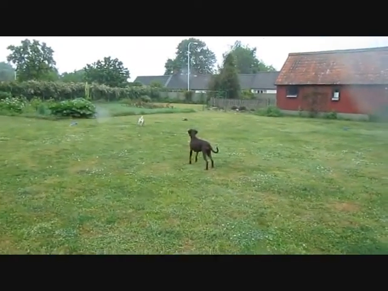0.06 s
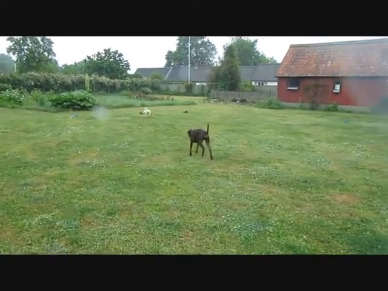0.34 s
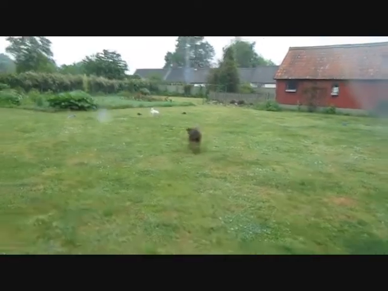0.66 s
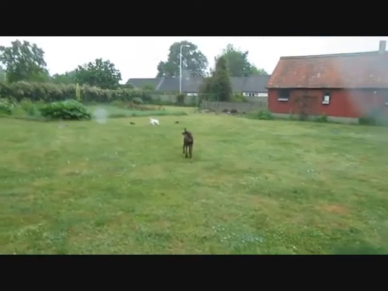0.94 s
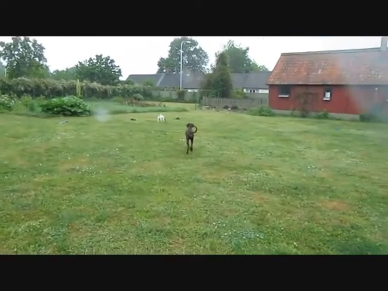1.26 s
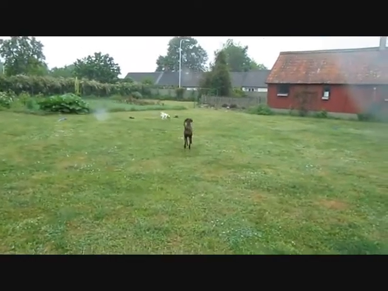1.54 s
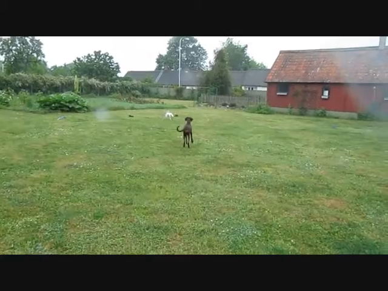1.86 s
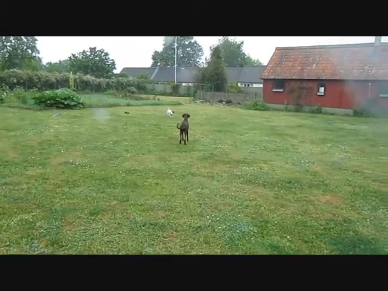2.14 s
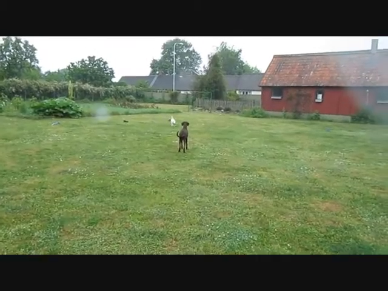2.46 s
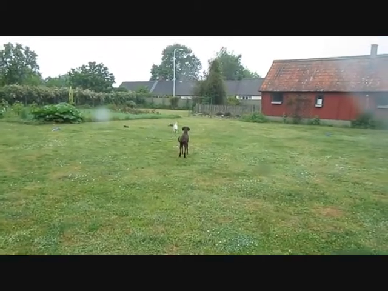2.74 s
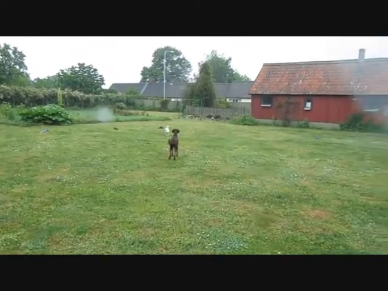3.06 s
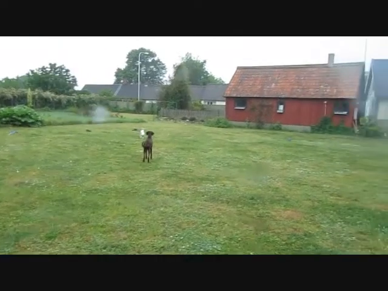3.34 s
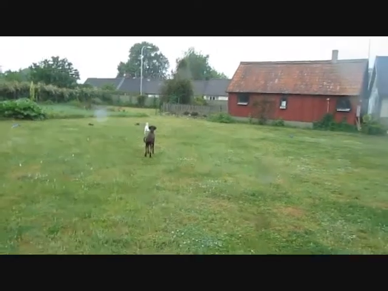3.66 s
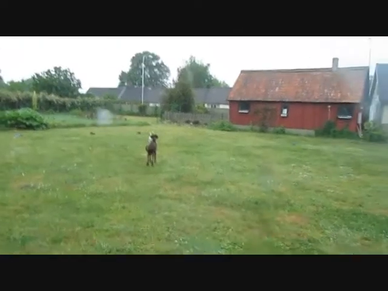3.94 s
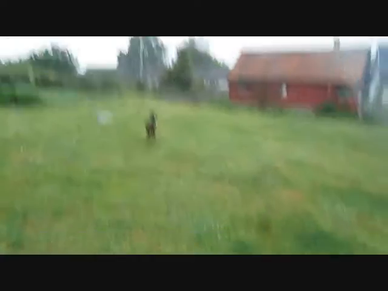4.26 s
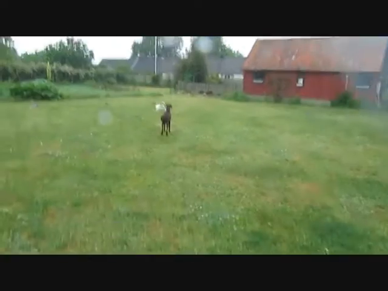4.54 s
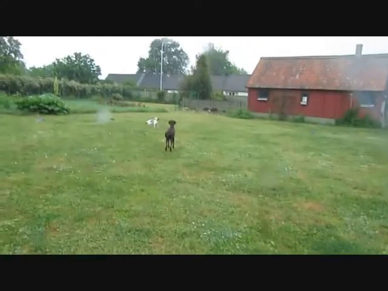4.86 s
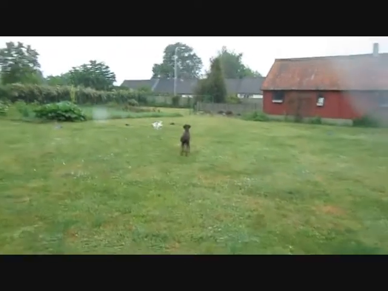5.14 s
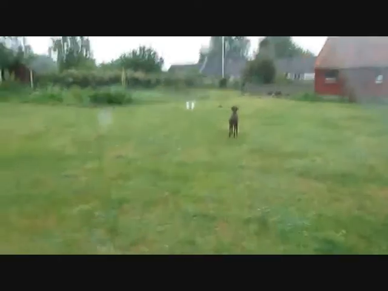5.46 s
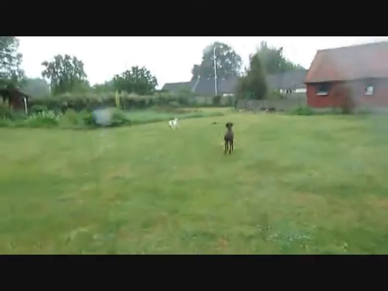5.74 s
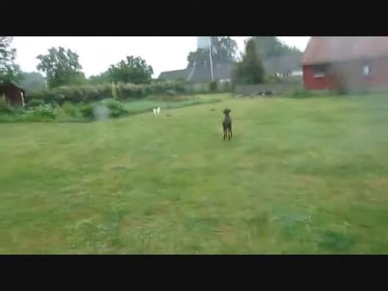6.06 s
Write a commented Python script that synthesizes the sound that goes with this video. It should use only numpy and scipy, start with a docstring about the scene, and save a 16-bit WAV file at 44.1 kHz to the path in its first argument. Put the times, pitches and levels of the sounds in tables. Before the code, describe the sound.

Sparrows chirp and cheep in an open garden for about six seconds, giving quick whistled calls two or three times a second, some slightly harsh, each with a light echo. A farther bird adds soft falling whistles and another twitters thin and high. A faint wash of distant roads and leaves lies underneath. During the first second, a cluster of dull, close handling bumps hits the hand-held microphone, with more near 2, 3.5, 4.3 and 6.2 seconds. Light gusts rumble and flutter on the microphone on and off, strongest from about 5.2 to 5.5 seconds, where a very faint low drone also swells and drops away. Between 5.5 and 6.1 seconds the plastic casing gives several sharp clicks, the loudest at about 5.8 seconds. The birds keep calling to the end.

```python
"""Sparrows on a breezy lawn

Sparrows chirp in quick whistled arches while a farther bird slurs falling whistles and another
twitters thinly. Trees, a barn and far houses throw the calls back over a distant wash of roads
and leaves. Light gusts rumble on a hand-held camera's two microphone ports; the hand gives it
dull bumps, and near the end its plastic casing rings with a few sharp clicks."""
import sys
import numpy as np
from scipy import signal
from scipy.fft import rfft, irfft
from scipy.io import wavfile
from scipy.ndimage import uniform_filter1d

SR = 44100
rng = np.random.default_rng(int(sys.argv[2]) if len(sys.argv) > 2 else 0)


def unload_audio(sound):
    """Save the sound as a 16-bit wav file, at the path given as the first command line argument."""
    columns = np.transpose(np.atleast_2d(sound))
    # keep every value between -1 and 1, then stretch to whole-number steps
    steps = np.round(np.clip(columns, -1, 1) * 32767)
    wavfile.write(sys.argv[1], SR, steps.astype(np.int16))


N = 277871
TIME = np.arange(N) / SR


def gain_of(db):
    """Decibels to amplitude."""
    return 10 ** (np.asarray(db) / 20)


def unit_rms(x):
    """Scales to rms 1."""
    return x / np.sqrt(np.mean(x ** 2) + 1e-20)


def at_hz(points, hz):
    """Reads a curve on a log-frequency axis."""
    point_hz, value = np.transpose(points)
    return np.interp(np.log(hz + 1), np.log(point_hz + 1), value)


def automation(rows):
    """Each column of a breakpoint table at every sample."""
    times, *columns = np.transpose(rows)
    return [np.interp(TIME, times, column) for column in columns]


def add(mix, start_s, sound):
    """Mixes a sound in at its start time."""
    part = mix[max(round(start_s * SR), 0):][:len(sound)]
    part += sound[:len(part)]


def wobble(rate_hz):
    """Smooth random motion of rms 1, rolling off above the rate."""
    hz = np.fft.rfftfreq(N, 1 / SR)
    return unit_rms(irfft(rfft(rng.standard_normal(N)) * np.exp(-(hz / rate_hz) ** 2), N))


def stereo_noise(spectrum, correlation, patchy_db):
    """Coloured stereo noise of rms 1 with drifting louder and softer patches."""
    frames, hz = N // 512 + 5, np.fft.rfftfreq(2048, 1 / SR)
    a, b, c, d, patches = np.moveaxis(rng.standard_normal((frames, len(hz), 5)), -1, 0)
    patches = unit_rms(uniform_filter1d(uniform_filter1d(patches, size=7, axis=0), size=14, axis=1))
    left = a + 1j * b
    right = correlation * left + np.sqrt(1 - correlation ** 2) * (c + 1j * d)
    spectra = np.array([left, right]) * gain_of(at_hz(spectrum, hz) + patchy_db * patches)
    return unit_rms(signal.istft(spectra.swapaxes(1, 2), nperseg=2048, noverlap=1536)[1][:, :N])


def noise_band(centre_hz, width_hz):
    """One band of noise around a steady or moving centre."""
    phase = 2 * np.pi * np.cumsum(centre_hz * np.ones(N)) / SR
    return unit_rms(wobble(width_hz) * np.cos(phase) + wobble(width_hz) * np.sin(phase))


# Fader moves of the wash (before its trim) and the hiss: time_s, level_db
WASH_FADER = [(0, -48.5), (.4, -46.5), (1.72, -51), (3.2, -51), (4.5, -51), (5.36, -53.5), (5.64, -47),
              (6.1, -50), (6.15, -57), (6.3, -50.5)]
HISS_FADER = [(.33, -68), (.38, -57), (.7, -57), (1.05, -60.5), (1.2, -66), (1.36, -62), (1.53, -62),
              (1.58, -72), (5.6, -66), (5.85, -64), (6.3, -64.5)]
# Their tone, a midrange wash and an airy hiss: freq_hz, relative_db
WASH_EQ = [(60, -33), (200, -17.5), (450, -3.5), (900, 2), (1400, 0), (2400, -0.5), (3300, -5.5),
           (3900, -11.5), (6200, -9.5), (8500, -23), (10500, -34), (14500, -72)]
HISS_EQ = [(1500, -25), (4000, -4), (6500, 8.5), (9500, 5), (12500, -6.5), (15000, -13)]


def air():
    """The far wash of roads and trees, and a faint hiss that comes and goes."""
    wash_db, hiss_db = automation(WASH_FADER)[0], automation(HISS_FADER)[0]
    wash = gain_of(wash_db + 2.5) * stereo_noise(WASH_EQ, correlation=.56, patchy_db=1.5)
    hiss = gain_of(hiss_db) * stereo_noise(HISS_EQ, correlation=.1, patchy_db=1)
    return wash * gain_of([[-.8], [.8]]) + hiss


# Broad tyre hum inside the wash: time_s, centre_hz, level_db
TYRE_HUM = [(0, 898, -58), (.6, 948, -50), (1.3, 1047, -50.5), (1.7, 1332, -47.5), (2.4, 1388, -49),
            (3.2, 1418, -53.5), (4.2, 1288, -54)]
# A low drone that swells late and drops away: time_s, level_db
DRONE_FADER = [(4.2, -89), (4.6, -68), (5.15, -61), (5.55, -58), (5.7, -101)]


def traffic():
    """Far tyres hum under a drifting pitch; a low drone, perhaps an engine, joins them."""
    centre_hz, tyres_db = automation(TYRE_HUM)
    tyres = gain_of(tyres_db) * noise_band(centre_hz, width_hz=540)
    drone = gain_of(automation(DRONE_FADER)[0]) * noise_band(centre_hz=118, width_hz=14.5)
    return tyres + drone


# Gusts on the microphone: start_s, length_s, rumble_db, flutter_db
MIC_GUSTS = [(0.115, 0.18, -67, -42.5), (0.514, 0.37, -56, -44.5), (1.008, 0.31, -58.5, -55),
             (1.63, 0.088, -46, -55), (1.928, 0.06, -50, -70), (2.16, 0.41, -54, -77),
             (2.49, 0.36, -45, -57.5), (3.152, 0.18, -46.5, -77), (3.427, 0.052, -40, -49.5),
             (3.572, 0.14, -66, -50.5), (4.218, 0.22, -39, -67), (4.72, 0.48, -52, -52),
             (5.19, 0.21, -33.5, -41.5), (5.483, 0.06, -35, -39.5), (5.73, 0.36, -54, -47)]
# Tone of the deep rumble and the lighter flutter: freq_hz, relative_db
RUMBLE_EQ = [(20, -44), (55, -8), (110, -1.5), (160, -5), (260, -22), (600, -62)]
FLUTTER_EQ = [(60, -43), (160, 2), (300, 1.5), (480, -3.5), (800, -34), (2000, -52)]


def wind(attack_s=.044, release_s=.034):
    """Gusts rise out of the breeze; their lumpy eddies push the two ports in opposite directions."""
    strength = gain_of([[-66], [-73]])  # rumble and flutter of the breeze between gusts
    for start_s, length_s, rumble_db, flutter_db in MIC_GUSTS:
        age = TIME - start_s
        envelope = np.exp(np.minimum(age, 0) / attack_s - np.maximum(age - length_s, 0) / release_s)
        strength = np.maximum(strength, gain_of([[rumble_db], [flutter_db]]) * envelope)
    rumble = strength[0] * gain_of(4.9 * wobble(rate_hz=20))
    rumble = rumble * stereo_noise(RUMBLE_EQ, correlation=-.94, patchy_db=-1.5)
    flutter = strength[1] * gain_of(1.3 * wobble(rate_hz=42))
    flutter = flutter * stereo_noise(FLUTTER_EQ, correlation=-.75, patchy_db=2.5)
    return (rumble + flutter) * gain_of([[-.8], [.8]])


# Soft handling thuds: start_s, level_db, pitch_hz, left_minus_right_db
HAND_BUMPS = [(.008, -24, 230, -3.5), (.023, -26, 270, -4.5), (.127, -28, 280, -2), (.184, -24, 300, -2.5),
              (.241, -19, 294, -4), (.266, -27, 320, -3), (.554, -26, 260, -4.5), (.585, -27, 210, -3),
              (.677, -33, 337, -5), (.771, -23, 300, -4.5), (.804, -25.5, 290, -5),
              (.815, -26, 230.8, -3.5), (.881, -32, 376, -5), (1.979, -26, 327, -4.5), (3.526, -23, 337, 5),
              (3.598, -32.5, 300, -4.5), (4.262, -26.5, 145, -5.5), (4.412, -32, 128.9, -4.5),
              (6.172, -28, 288, 2.5)]


def bumps(attack_s=.002, decay_cycles=2.13, scuff_db=-5.5, scuff_decay_s=.012):
    """The hand knocks the camera: a heavily damped swing and a little scuff, pushing the ports apart."""
    out, t = np.zeros((2, N)), np.arange(SR // 5) / SR
    for start_s, db, hz, balance_db in HAND_BUMPS:
        bandpass = signal.butter(2, [hz * .58, hz * 1.57], "band", fs=SR, output="sos")
        scuff = unit_rms(signal.sosfilt(bandpass, rng.standard_normal(len(t))))
        swing = np.sin(2 * np.pi * hz * t) * (1 - np.exp(-t / attack_s)) * np.exp(-t * hz / decay_cycles)
        thud = gain_of(db) * (swing + gain_of(scuff_db) * scuff * np.exp(-t / scuff_decay_s))
        add(out[0], start_s, gain_of(balance_db / 2) * thud)
        add(out[1], start_s, -gain_of(-balance_db / 2) * thud)
    return out


def sing(notes, rasp, rasp_hz, shimmer, overtone_db, taper, skirt_db, warble):
    """A bird's voice: each note whistles through three pitches inside a weak, breathy swell."""
    out, shake, tremble = np.zeros(N + SR), wobble(rasp_hz), wobble(rasp_hz / 2)
    buzz = np.sin(2 * np.pi * np.cumsum(190 * (1 + .25 * wobble(11.13))) / SR)  # rough notes flutter
    for start_s, length_s, start_hz, middle_hz, end_hz, db, roughness in notes:
        size = max(round(length_s * SR), 40)
        index = np.arange(-2 * size, size + size // 2)
        progress = index / size  # 0 to 1 across the note itself
        at = (round(start_s * SR) + index) % N
        contour = np.polyfit([0, .5, 1], [start_hz, middle_hz, end_hz], 2)
        bend_hz = np.polyval(contour, np.clip(progress, 0, 1))
        scoop_hz = max(middle_hz - start_hz, 0) * np.tanh(2 * np.minimum(progress, 0))
        run_out_hz = (end_hz - middle_hz) * np.maximum(progress - 1, 0)
        rough = np.where(progress < 0, max(roughness, .5), roughness)
        jitter = 1 + rough * (rasp * shake[at] + warble * buzz[at])
        phase = 2 * np.pi * np.cumsum((bend_hz + scoop_hz + run_out_hz) * jitter) / SR
        body = np.pad(signal.windows.tukey(size, taper), (2 * size, size // 2))
        skirt = gain_of(skirt_db) * np.interp(progress, [-2, 0, 1, 1.5], [0, 1, 1, 0]) ** 2
        flicker = np.exp(shimmer * np.sqrt(rough) * (tremble[at] + buzz[at]))
        overtones = np.sin(2 * phase) + .1 * np.sin(3 * phase) + .01 * np.sin(4 * phase)
        overtones *= gain_of(overtone_db) / (1 + (bend_hz / 4300) ** 8)  # higher notes sound purer
        tone = np.maximum(body, skirt) * flicker * (np.sin(phase) + overtones)
        add(out, start_s - 2 * size / SR, gain_of(db) * tone / np.std(tone[body > 0]))
    return out[:N]


def slides(rows, roughness):
    """Notes that glide straight from one pitch to another."""
    return [(start_s, length_s, from_hz, (from_hz + to_hz) / 2, to_hz, db, roughness)
            for start_s, length_s, from_hz, to_hz, db in rows]


# Reverb time of the garden: freq_hz, t60_s
GARDEN_DECAY = [(1500, 1), (3000, 0.4), (6000, 0.4), (12000, 0.81)]


def garden(dry, wet_db, wall_s, wall_db, spread_s, right_lag_s, balance_db, leaves_s, leaves_db):
    """Direct sound reaching the left port first, a smeared echo off buildings, and scatter from trees."""
    t = np.arange(SR) / SR
    taps = rng.standard_normal((3, SR)) * (rng.random(SR) < 2000 / SR)
    mid, side, early = taps
    hz, frame_s, spectra = signal.stft(mid + .6 * np.array([side, -side]), SR, nperseg=256)
    decay = gain_of(-60 * frame_s / at_hz(GARDEN_DECAY, hz)[:, None])
    tail = signal.istft(spectra * decay * (1 - np.exp(-frame_s / .0026)), SR, nperseg=256)[1]
    scatter = signal.fftconvolve(dry[None], tail / np.linalg.norm(tail[0]), axes=1)[:, :N]
    wall = early * (t > wall_s) * np.exp(-abs(t - wall_s) / spread_s)  # walls and roof at varied range
    leaves = early * np.exp(-t / leaves_s)  # leaves around the perch break up each sweep
    echoes = gain_of(wall_db) * wall / np.linalg.norm(wall)
    echoes += gain_of(leaves_db) * leaves / np.linalg.norm(leaves)
    left = dry + signal.fftconvolve(dry, echoes)[:N]
    right = irfft(rfft(left) * np.exp(-2j * np.pi * np.fft.rfftfreq(N, 1 / SR) * right_lag_s), N)
    pan = gain_of([[balance_db / 2], [-balance_db / 2]])
    return (np.array([left, right]) + gain_of(wet_db) * scatter) * pan


# Thin sliding notes: start_s, length_s, start_hz, end_hz, send_db
THIN_NOTES = [(.045, 0.021, 3400, 3850, -55), (.07, 0.021, 5450, 5100, -64), (.098, .02, 4800, 4550, -60),
              (0.133, 0.035, 4800, 4230, -57), (.165, 0.027, 4030, 3550, -64),
              (.172, .018, 5200, 5600, -58), (.2, 0.028, 4100, 4200, -59.5), (0.23, 0.025, 4600, 4330, -59),
              (1.685, .025, 6800, 7000, -70), (1.708, 0.017, 5480, 5940, -55.5),
              (1.73, 0.023, 4080, 4150, -62), (1.76, 0.028, 7000, 5850, -68),
              (1.772, 0.044, 2720, 2270, -57.5), (1.9, .035, 2550, 2070, -63),
              (2.215, 0.05, 8900, 7900, -71), (2.222, 0.066, 7650, 6800, -67),
              (2.265, 0.034, 7850, 7600, -63), (2.292, 0.026, 5150, 4470, -58.5),
              (2.365, 0.079, 7480, 6220, -65), (2.372, 0.017, 5350, 5900, -58),
              (2.38, 0.041, 8600, 7760, -69), (2.41, .032, 7900, 6500, -68),
              (2.405, 0.019, 5300, 4840, -60), (2.44, 0.019, 5600, 6400, -62),
              (3.122, 0.049, 4060, 3210, -64.5), (3.43, 0.068, 7280, 7280, -64),
              (3.448, 0.024, 5870, 5800, -58.5), (3.505, 0.029, 5500, 5170, -58),
              (3.57, 0.025, 5550, 5400, -55), (3.945, .035, 7750, 7200, -70),
              (3.985, 0.04, 7390, 7640, -69), (4.0, 0.048, 5300, 4340, -64),
              (4.025, 0.031, 6750, 6750, -72)]
# Flurries of soft high twitter: start_s, length_s, note_send_db
TWITTER_FLURRIES = [(1.68, .25, -66), (2.21, .28, -68), (3.44, .2, -67), (3.98, .16, -67)]


def twitterer(notes_per_s=73, note_s=.032, low_hz=4690, high_hz=7820, max_fall=.15):
    """Thin, clean high notes from far away, over flurries of softer, quicker ones."""
    notes = slides(THIN_NOTES, roughness=.1)
    for start_s, length_s, db in TWITTER_FLURRIES:
        for when, pitch, slope in rng.random((round(notes_per_s * length_s), 3)):
            hz = low_hz + pitch * (high_hz - low_hz)
            contour_hz = hz * (1 - max_fall * slope * np.array([0, .5, 1]))
            notes.append((start_s + when * length_s, note_s, *contour_hz, db, .5))
    song = sing(notes, rasp=.03, rasp_hz=400, shimmer=.5, overtone_db=-28, taper=.3,
                skirt_db=-20, warble=.01)
    return gain_of(4) * garden(song, wet_db=-2, wall_s=.07, wall_db=-9, spread_s=.012,
                               right_lag_s=3e-5, balance_db=0, leaves_s=.002, leaves_db=-6)


# Falling whistles, each after a soft, level note: start_s, length_s, soft_note_db, fall_db
FALLING_WHISTLES = [(0.127, 0.043, -54.5, -51.5), (1.043, 0.046, -63, -50), (2.299, 0.07, -57, -52),
                    (3.468, 0.059, -50.5, -44), (4.006, .05, -54, -45), (4.543, 0.057, -63, -45),
                    (5.578, 0.048, -59, -60)]
# Short falling slurs, mostly echoes of the whistles and their soft notes:
# start_s, length_s, start_hz, end_hz, level_db
ECHO_SLURS = [(.098, 0.029, 3190, 2950, -53), (.19, 0.047, 3150, 2800, -50), (1.14, 0.063, 2450, 1840, -53),
              (2.403, 0.044, 2335, 1954, -51.5), (3.131, 0.1, 2042, 1887, -53.5),
              (3.528, 0.032, 2680, 2450, -49.5), (3.598, 0.032, 2130, 2010, -49),
              (4.03, .035, 3110, 2650, -49.5), (4.073, 0.042, 3100, 2810, -48),
              (4.147, 0.018, 3310, 2630, -41), (4.722, 0.043, 2795, 2520, -52)]


def whistler(soft_s=.04, trail_s=.024):
    """Falling whistles that trail off faintly, blurred by the trees and returned by far houses."""
    soft_hz, fall_hz, trail_hz = (2974, 2983, 2885), (2540, 2124, 1767), (1780, 1620, 1480)
    notes = slides(ECHO_SLURS, roughness=.23)
    for start_s, length_s, soft_db, fall_db in FALLING_WHISTLES:
        notes += [(start_s - soft_s, soft_s, *soft_hz, soft_db, .15),
                  (start_s, length_s, *fall_hz, fall_db, .15),
                  (start_s + length_s, trail_s, *trail_hz, fall_db - 10, .15)]
    song = sing(notes, rasp=.09, rasp_hz=400, shimmer=.55, overtone_db=-30, taper=.15,
                skirt_db=-16, warble=0)
    return garden(song, wet_db=2, wall_s=.1, wall_db=-4, spread_s=.03,
                  right_lag_s=1e-5, balance_db=-2.5, leaves_s=.014, leaves_db=-2)


def call_notes(rows, ending, lead_s, lead_hz, arch_ends, whip_s=.012):
    """Lead-ins, arches and endings of one kind of call; arch_ends are shares of the arch's top pitch."""
    leads, arches, endings = [], [], []
    for start_s, length_s, top_hz, lead_db, arch_db, ending_db in rows:
        from_hz, to_hz = top_hz * np.array(arch_ends)
        whip_hz = np.linspace(lead_hz[-1], from_hz * 1.08, 3)  # whips just past the arch's first pitch
        leads.append((start_s - lead_s, lead_s - whip_s / 2, *lead_hz, lead_db, .5))
        leads.append((start_s - whip_s, whip_s, *whip_hz, lead_db - 1.5, .5))
        arches.append((start_s, length_s, from_hz, top_hz, to_hz, arch_db, .4))
        endings += [(start_s + length_s + after_s, note_s, *contour_hz, ending_db + db, roughness)
                    for after_s, note_s, *contour_hz, db, roughness in ending]
    return leads, arches, endings


# Sparrow cues, levels before the bus gains: start_s, arch_s, top_hz, lead_db, arch_db, ending_db
CHIRP_CUES = [(.542, 0.039, 4350, -54, -42.5, -37), (2.784, 0.035, 4420, -55, -45, -35),
              (4.862, .038, 4430, -51.5, -38, -31.5)]  # low and flat, ending in a quick dip
CHEEP_CUES = [(.906, 0.043, 5890, -55.5, -40.5, -80), (1.848, 0.045, 5200, -57, -47, -45),
              (3.712, 0.045, 5960, -50.5, -40.5, -44), (5.269, .044, 6010, -54.5, -42, -42),
              (5.914, 0.051, 5255, -52.5, -40, -43)]  # higher, ending in an upward flick
SCOLD_CUES = [(1.269, 0.011, 4820, -48, -37, -32.5), (3.641, 0.0099, 5140, -50, -41, -34.5)]  # a hard flick and a low downward slur
CHIRRUP_CUES = [(1.392, 0.031, 4820, -55, -51.5, -46), (2.025, 0.038, 4830, -54, -40.5, -39),
                (2.571, 0.033, 4990, -53, -50.5, -42), (3.292, 0.033, 4930, -50, -46.5, -40.5),
                (4.093, 0.035, 4740, -48.5, -44, -52), (4.247, 0.035, 4966, -49.5, -38, -37),
                (4.911, 0.029, 5020, -62, -48.5, -44), (5.524, 0.037, 4850, -49.5, -38, -37),
                (5.74, 0.033, 4860, -46, -45.5, -41)]  # ending in a low wiggle
# Closing notes of each call: after_arch_s, length_s, start_hz, middle_hz, end_hz, relative_db, roughness
CHIRP_TAIL = [(0, .009, 4200, 3490, 2760, -7, 0.25), (0.013, 0.0084, 3066, 3324, 3370, -2.5, 0.064),
              (.048, .007, 3600, 3354, 3170, -9, 0.15), (.058, 0.0068, 3300, 2940, 2800, -12, 0.18)]
CHEEP_TAIL = [(-.001, .013, 4200, 3590, 3160, -9, 0.42), (.028, .031, 3320, 4380, 5380, -8, 0.2),
              (0.062, 0.011, 4065, 3377, 3300, -5.5, 0.35)]
SCOLD_TAIL = [(.004, 0.017, 7600, 7120, 6560, -22, 0.36), (.016, 0.016, 4770, 5100, 5970, -12.5, 0.46),
              (0.024, 0.034, 2850, 3355, 3200, -10, 0.18), (.042, .024, 3200, 3020, 2880, -3, 0.1),
              (0.062, .018, 2990, 2740, 2530, -12, 0.19)]
CHIRRUP_TAIL = [(.002, 0.013, 3100, 3200, 3340, -9, 0.16), (0.028, 0.022, 3026, 3280, 3440, -3.5, 0.33),
                (0.048, .01, 3650, 3950, 4000, -14, .4), (0.06, .012, 3465, 3050, 2820, -1, 0.25)]
# Single arched notes, clean peeps (a few of them repeat earlier calls off the barn about 0.1 s later) and harsh
# churrs: start_s, length_s, top_hz, send_db
PEEP_CUES = [(0.279, 0.025, 6670, -45), (0.368, 0.021, 5120, -53), (1.024, 0.022, 5200, -48.5),
             (1.018, 0.023, 6070, -63), (3.175, 0.045, 3270, -53.5), (2.212, .02, 3540, -53),
             (4.779, 0.027, 6780, -45), (5.342, 0.032, 6760, -43.5), (5.44, 0.015, 5360, -48.5),
             (5.773, 0.021, 6800, -41), (5.861, 0.037, 5070, -47.5), (6.261, 0.047, 6660, -41),
             (6.275, 0.029, 4840, -44)]
CHURR_CUES = [(0.56, 0.021, 6500, -52), (0.583, .04, 4980, -54), (0.613, 0.038, 2650, -46),
              (0.621, .026, 3450, -49), (0.647, 0.034, 3390, -48), (2.926, .028, 3470, -54),
              (0.653, .03, 2600, -49), (0.69, 0.04, 3320, -50), (1.427, .035, 3360, -53),
              (1.289, .03, 3400, -52), (3.66, .04, 4900, -60), (3.67, .05, 3300, -54),
              (4.888, .022, 6200, -54), (5.574, .036, 2830, -45.5), (5.685, .04, 2897, -50)]


def sparrows():
    """Calls whip up from a low, octave-rich note, draw a thin arch and end clear; a barn echoes them."""
    kinds = [
        call_notes(CHIRRUP_CUES, CHIRRUP_TAIL, .04, lead_hz=(2950, 3020, 3300), arch_ends=(.78, .72)),
        call_notes(CHIRP_CUES, CHIRP_TAIL, .04, lead_hz=(2780, 2920, 3200), arch_ends=(.92, .98)),
        call_notes(CHEEP_CUES, CHEEP_TAIL, .065, lead_hz=(3100, 3450, 4050), arch_ends=(.8, .75)),
        call_notes(SCOLD_CUES, SCOLD_TAIL, .04, lead_hz=(2400, 2550, 3200), arch_ends=(.81, .77))]
    leads, arches, endings = (sum(notes, []) for notes in zip(*kinds))
    peeps = [(start_s, length_s, hz * .88, hz, hz * .93, db, .1)
             for start_s, length_s, hz, db in PEEP_CUES]
    churrs = [(start_s, length_s, hz * .83, hz, hz * .83, db, .65)
              for start_s, length_s, hz, db in CHURR_CUES]
    rising = sing(leads, rasp=.085, rasp_hz=1300, shimmer=.55, overtone_db=3.5, taper=.5,
                  skirt_db=-20, warble=.025)
    arching = sing(arches, rasp=.043, rasp_hz=1300, shimmer=.52, overtone_db=-19, taper=.18,
                   skirt_db=-17, warble=.03)
    harsh = sing(churrs, rasp=.09, rasp_hz=900, shimmer=.6, overtone_db=-20, taper=.4,
                 skirt_db=-12, warble=.09)
    clear = sing(endings + peeps, rasp=.075, rasp_hz=800, shimmer=.4, overtone_db=-28, taper=.2,
                 skirt_db=-26, warble=.05)
    barn = dict(wall_s=.101, wall_db=-10.5, spread_s=.002, right_lag_s=2.2e-5)
    perch = dict(balance_db=-1.5, leaves_s=.003, leaves_db=-5)
    arch_bus = garden(rising + arching, wet_db=-2.5, **barn, **perch)
    churr_bus = garden(harsh, wet_db=0, **barn, balance_db=-2.5, leaves_s=.012, leaves_db=-2.5)
    clear_bus = garden(clear, wet_db=-5, **barn, **perch)
    return gain_of(3) * (arch_bus + churr_bus) + gain_of(3.5) * clear_bus


# Casing clicks: start_s, knock_db, snap_db
CASING_CLICKS = [(4.986, -52, -50), (5.464, -28, -37), (5.562, -19, -46), (5.7947, -28, -28),
                 (5.8345, -14.5, -1.5), (5.8873, -30.5, -22.5), (6.0432, -42, -34), (6.0982, -33, -37)]
# Low casing modes that knock: pitch_hz, relative_db, t60_s
KNOCK_MODES = [(1150, -32, .008), (1936, 14.5, 0.0095), (2330, 13, 0.0066), (3000, 10.5, 0.0077),
               (3330, 5, 0.012), (4730, 10.5, 0.0042)]
# High modes that snap, each nearer one port: pitch_hz, relative_db, t60_s, left_minus_right_db
SNAP_MODES = [(6150, 5.5, 0.0018, 4.5), (7750, 2, 0.0016, 25), (8500, -20, 0.0094, 13),
              (11770, 3, 0.0018, -8)]


def clicks(attack_s=.00037):
    """Plastic parts knock and snap; each click rings the casing for a few milliseconds."""
    out, t = np.zeros((2, N)), np.arange(SR // 20) / SR
    sides = np.array([[.5], [-.5]])
    knock = sum(gain_of(db - 60 * t / t60) * np.sin(2 * np.pi * hz * t) for hz, db, t60 in KNOCK_MODES)
    snap = sum(gain_of(db - 60 * t / t60 + sides * balance_db) * np.sin(2 * np.pi * hz * t)
               for hz, db, t60, balance_db in SNAP_MODES)
    attack = 1 - np.exp(-t / attack_s)
    knock, snap = knock * attack, snap * attack
    for start_s, knock_db, snap_db in CASING_CLICKS:
        click = gain_of(knock_db) * knock / abs(knock).max() + gain_of(snap_db) * snap / abs(snap).max()
        for port, channel in zip(out, click):
            add(port, start_s, channel)
    return out


def scene():
    """Birds over the distant bed, with wind and handling up close."""
    return sparrows() + whistler() + twitterer() + air() + traffic() + wind() + bumps() + clicks()


def record(dry):
    """The camera's band limit cuts the top of the treble."""
    lowpass = signal.firwin(255, cutoff=15200, window=("kaiser", 9), fs=SR)
    return signal.oaconvolve(dry, lowpass[None], "same")


dry = scene()
out = record(dry)
unload_audio(out)
```